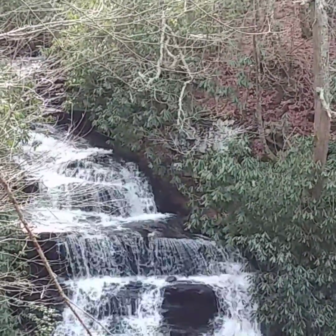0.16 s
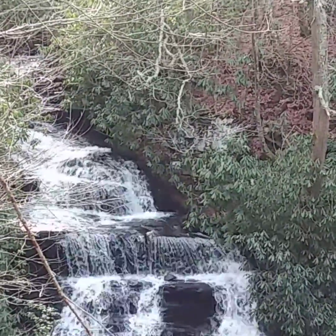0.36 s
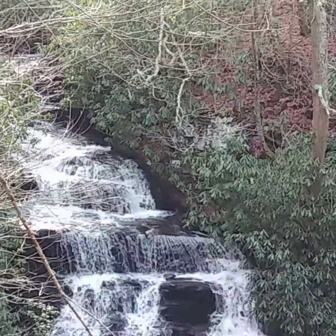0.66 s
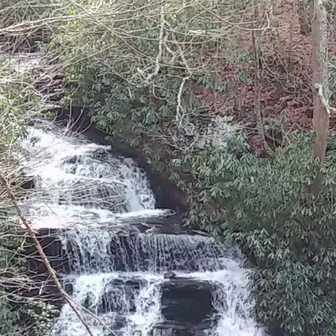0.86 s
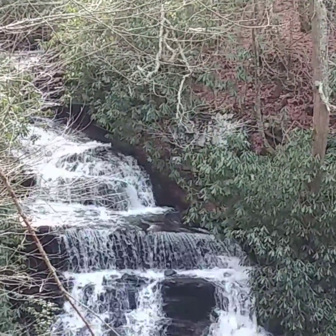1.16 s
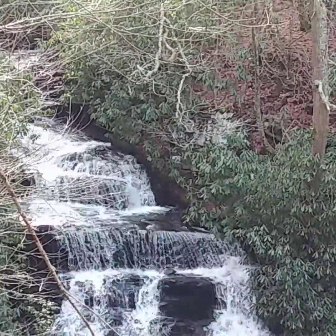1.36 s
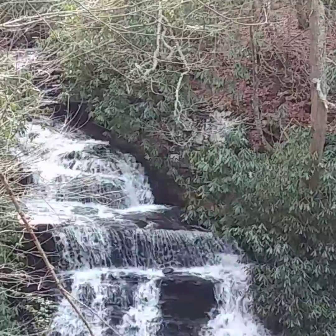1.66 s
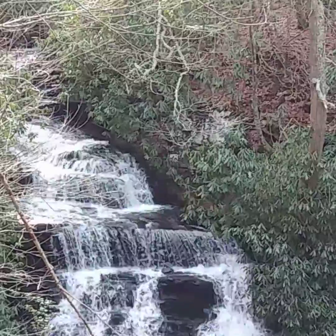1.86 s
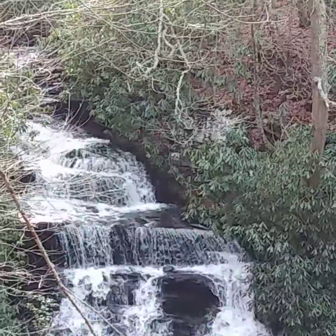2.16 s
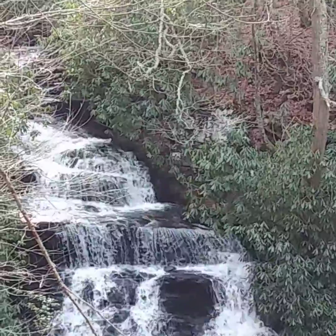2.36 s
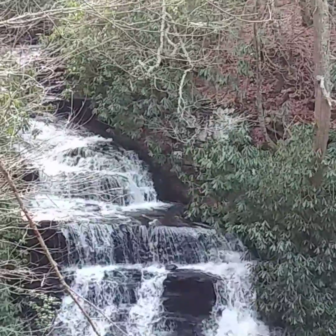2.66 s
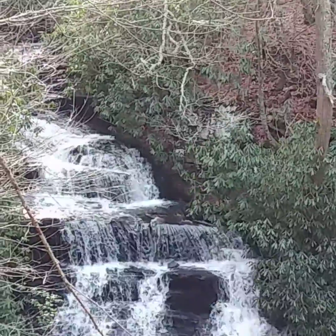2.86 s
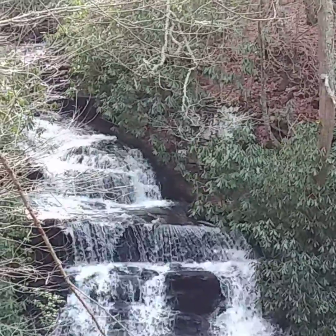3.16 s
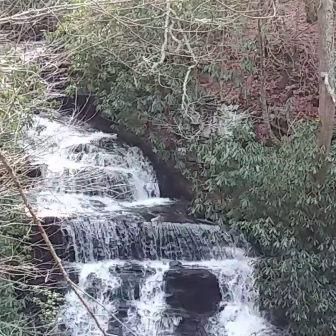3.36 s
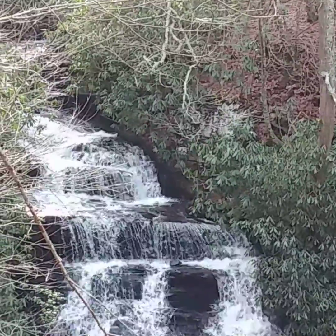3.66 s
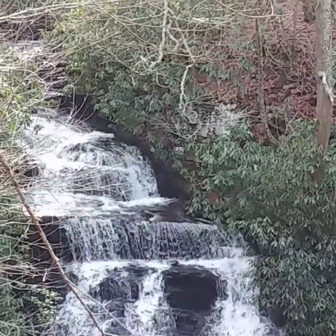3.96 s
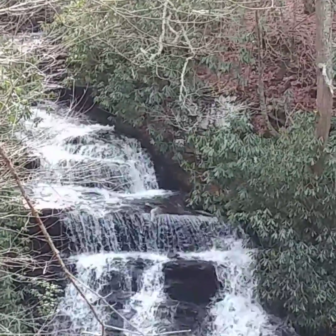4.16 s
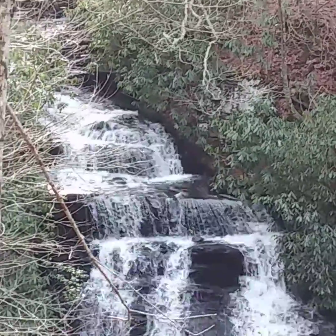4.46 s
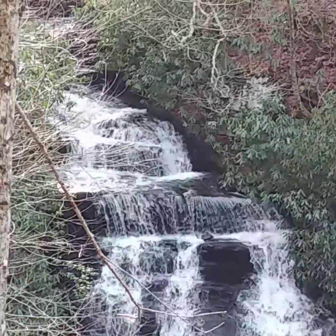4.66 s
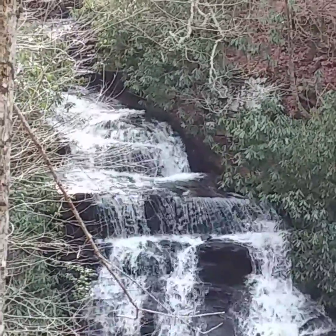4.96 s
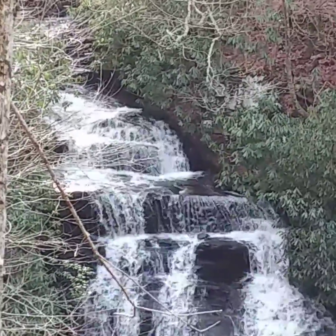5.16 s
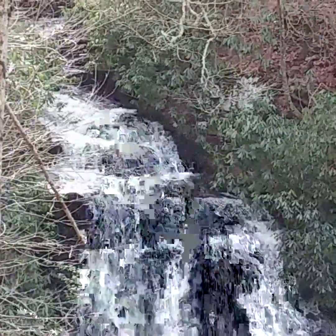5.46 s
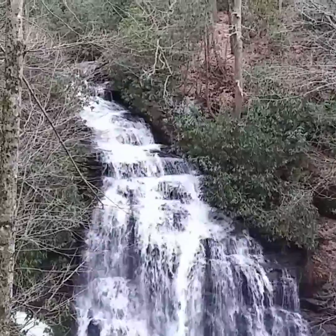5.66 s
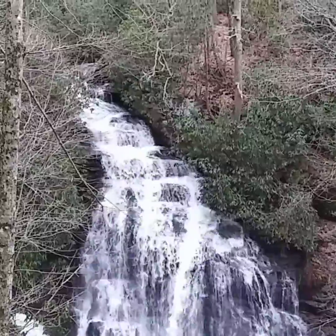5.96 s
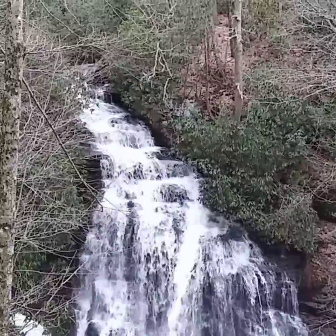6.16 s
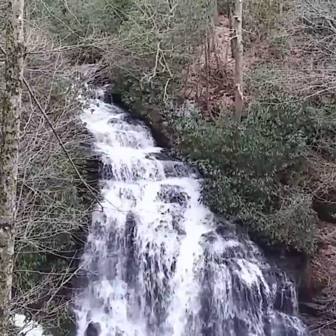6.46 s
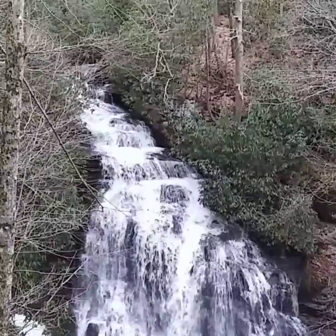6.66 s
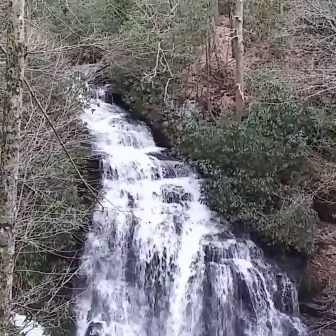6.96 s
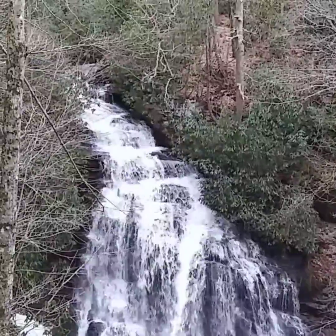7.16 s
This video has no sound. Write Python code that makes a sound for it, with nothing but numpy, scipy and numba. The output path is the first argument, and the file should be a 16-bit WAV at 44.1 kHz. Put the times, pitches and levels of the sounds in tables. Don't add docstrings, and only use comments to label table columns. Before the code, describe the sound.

From 0 to about 5.27 seconds a waterfall roars continuously over rock ledges, heard from across a ravine: a dense, noise-like rush of countless drops and bubbles, with a rumbling pool below, bright hissing spray above and very little of the highest air. The level surges only slightly. At 5.27 the tone changes abruptly to the same fall from its side, a little quieter and differently coloured. At about 5.43 it stops sharply, leaving an almost empty gap of some 0.03 seconds. From 5.46 the roar fades in over roughly a quarter second, knocked back slightly near 5.52 and 5.58. By 5.7 it is full, with a stronger low rumble from the foot of the fall, and stays steady to the end near 7.4. The sound is central, with only fleeting, faint widening in the high spray.

```python
import sys
import numpy as np
from scipy import signal
from scipy.fft import rfft, irfft, next_fast_len
from scipy.io import wavfile
from scipy.ndimage import uniform_filter1d
from numba import njit

SR = 44100
rng = np.random.default_rng(int(sys.argv[2]) if len(sys.argv) > 2 else 0)


def transcribe(u):
    v = np.clip(np.atleast_2d(u).T, -1, 1)
    q = np.round(v * 32767).astype(np.int16)
    wavfile.write(sys.argv[1], SR, q)


def gain_from_db(level_db):
    decades = np.asarray(level_db, float) / 20
    return 10 ** decades


N = 322371
CUT_S, STOP_S, START_S = 5.271, 5.4252, 5.4583


def unit(x):
    return x / np.sqrt(np.mean(x ** 2))


def walk(rate_hz):
    hold = int(SR / rate_hz)
    steps = np.repeat(rng.standard_normal(N // hold + 1), hold)
    smooth = uniform_filter1d(uniform_filter1d(steps, hold), hold)
    return unit(smooth[:N])


def colour(x, spectrum, level_db):
    size = next_fast_len(N)
    pitch_hz, shape_db = np.transpose(spectrum)
    log_pitch = np.log(np.arange(size // 2 + 1) * SR / size + 1)
    gain = gain_from_db(np.interp(log_pitch, np.log(pitch_hz), shape_db))
    shaped = irfft(rfft(x, size) * gain, size)[:N]
    return gain_from_db(level_db) * unit(shaped)


def silence(t):
    after_ms = 1000 * np.abs(t - STOP_S)
    before_ms = 1000 * np.abs(START_S - t)
    ring = gain_from_db(-12 - 9 * after_ms)
    smear = gain_from_db(-38 - .95 * after_ms)
    foreshadow = gain_from_db(-44 - 1.8 * before_ms)
    return ring + smear + foreshadow


# (start_s, level_db)
GAIN_DUCKS = [
    (5.518, -2.5),
    (5.579, -2.5),
]


def fade_in(t):
    fade_s, power, head_s, release_s = 0.23, 0.67, 0.0042, 0.038
    rise = np.clip((t - START_S + head_s) / fade_s, 0, 1) ** power
    duck_db = 0
    for start_s, level_db in GAIN_DUCKS:
        duck_db = duck_db + level_db * (t > start_s) * np.exp(-np.abs(t - start_s) / release_s)
    return rise * gain_from_db(duck_db)


# (start_s, pitch_hz)
WIDE_MOMENTS = [(.7442, 6600), (1.2086, 10350), (2.4857, 11400), (3.1126, 5500), (3.3912, 6250),
                (5.0399, 5700), (5.0399, 9650), (6.0615, 9650), (6.0615, 11700), (6.2937, 8300),
                (6.2937, 12400), (6.4098, 13800), (6.5724, 13100), (6.8278, 10350), (7.1064, 8300),
                (7.1064, 12400)]


def widen(x):
    out, size, width_hz = x.copy(), 2048, 1550
    window = signal.windows.kaiser_bessel_derived(size, 4 * np.pi)
    bin_hz = np.arange(size // 2 + 1) * SR / size

    def band(first, pitch_hz):
        keep = np.abs(bin_hz - pitch_hz) < width_hz / 2
        return irfft(rfft(x[0, first:first + size]) * keep) * window

    for start_s, pitch_hz in WIDE_MOMENTS:
        first = int(start_s * SR) - size // 2
        here = band(first, pitch_hz)
        earlier = band(first - size, pitch_hz)
        opposite = earlier * np.array([[1], [-1]])
        out[:, first:first + size] += (np.sqrt(.5) - 1) * here + np.sqrt(.5) * opposite
    return out


def drop_strikes():
    return rng.standard_normal(N) * gain_from_db(.6 * rng.exponential(size=N))


@njit
def ring_bubbles(start, pitch_hz, cycles, size, glide):
    out = np.zeros(N + 4096)
    for k in range(len(start)):
        length = min(int(3 * cycles[k] * SR / pitch_hz[k]), 4095)
        turn = np.exp(pitch_hz[k] / SR * (2j * np.pi - 1 / cycles[k]))
        rise = np.exp(2j * np.pi * pitch_hz[k] / SR * glide / length)
        z = size[k] + 0j
        for i in range(length):
            out[start[k] + i] += z.imag
            z *= turn
            turn *= rise
    return out[:N]


def bubble_swarm(count=120000):
    when, pitch, ring, size = rng.random((count, 4)).T
    start = (when * N).astype(np.int64)
    pitch_hz = 400 + 14000 * pitch
    size = gain_from_db(6 * size) * np.sqrt(pitch_hz)
    clump_db = 2 + 2.8 * walk(55)[start]
    size = size * gain_from_db(np.where(pitch_hz < 2500, clump_db, 0))
    return ring_bubbles(start, pitch_hz, 3 * (1 + ring), size, .2)


def water():
    mix = unit(drop_strikes()) + gain_from_db(-10) * unit(bubble_swarm())
    return mix * gain_from_db(.12 * walk(12))


# (pitch_hz, level_db)
UPPER_POOL = [(22, -41), (50, -43), (90, -22.5), (150, -14.5), (190, -9.5), (250, -4), (320, -3.5),
              (430, -10), (520, -7), (650, -4.5), (850, -5), (1050, -3)]
UPPER_SPRAY = [(1250, -2), (2150, -1.96), (2650, -6.5), (3120, -13.5), (3600, -6.5), (4050, -3.5),
               (4900, -4), (5350, -7.5), (5780, -16), (6400, -4), (7500, 0), (8500, -6.5), (9400, -16.5),
               (11000, -24.5)]
UPPER_MIST = [(11700, -33), (13000, -36.5), (14500, -42), (15600, -43)]


def upper_stand(raw):
    return colour(raw, UPPER_POOL + UPPER_SPRAY + UPPER_MIST, -19.9)


# (pitch_hz, level_db)
SIDE_POOL = [(22, -36), (100, -18), (200, -10.5), (300, -1), (450, -7.5), (620, -2.5), (1100, -6.4)]
SIDE_SPRAY = [(1600, 1.5), (2000, -4), (2450, 0.5), (2900, -4.5), (3700, -6), (4500, -12), (5400, -7),
              (5900, -9), (6600, -4.5), (7500, -1), (8300, -9), (9000, -13.5), (10500, -23)]
SIDE_MIST = [(12000, -28), (13500, -35.6), (15500, -41.2)]


def side_stand(raw):
    return colour(raw, SIDE_POOL + SIDE_SPRAY + SIDE_MIST, -21.5)


# (pitch_hz, level_db)
FOOT_POOL = [(22, -39), (50, -35.4), (90, -21.5), (150, -10.5), (210, -1.5), (320, -0.5), (410, -8),
             (520, -4.5), (750, -3.5), (1100, -2.5)]
FOOT_SPRAY = [(1500, -2.5), (2350, -0.5), (3000, -4), (3800, -7.5), (4700, -10.5), (5300, -10.5),
              (5650, -14), (6300, -5), (7350, 0.3), (8200, -5), (9000, -15.5), (9700, -17), (10400, -21.5),
              (11000, -31.5)]
FOOT_MIST = [(12000, -32), (13800, -32.7), (14500, -36.5), (15600, -40.0)]


def foot_stand(raw):
    return colour(raw, FOOT_POOL + FOOT_SPRAY + FOOT_MIST, -20)


def scene():
    t = np.arange(N) / SR
    raw = water()
    upper, side = upper_stand(raw), side_stand(raw)
    gap = side * silence(t)
    foot = foot_stand(raw) * fade_in(t)
    mono = np.select([t < CUT_S, t < STOP_S, t < START_S], [upper, side, gap], foot)
    return np.array([mono, mono])


def low_pass(x):
    return signal.sosfilt(signal.butter(12, 15670, fs=SR, output="sos"), x)


def record(dry):
    return low_pass(widen(dry))


dry = scene()
out = record(dry)
transcribe(out)
```